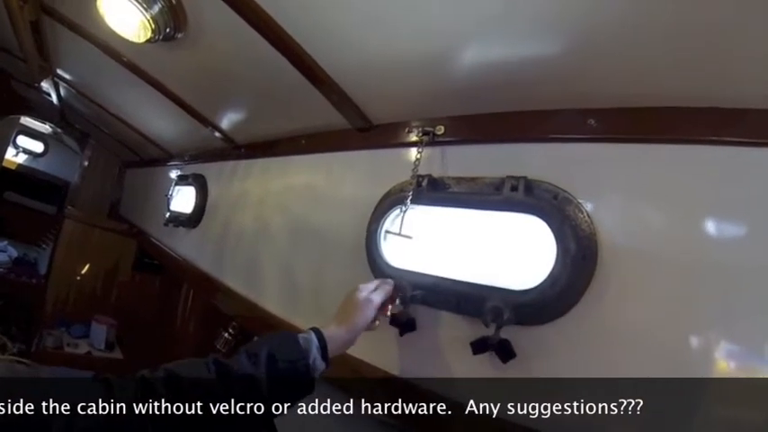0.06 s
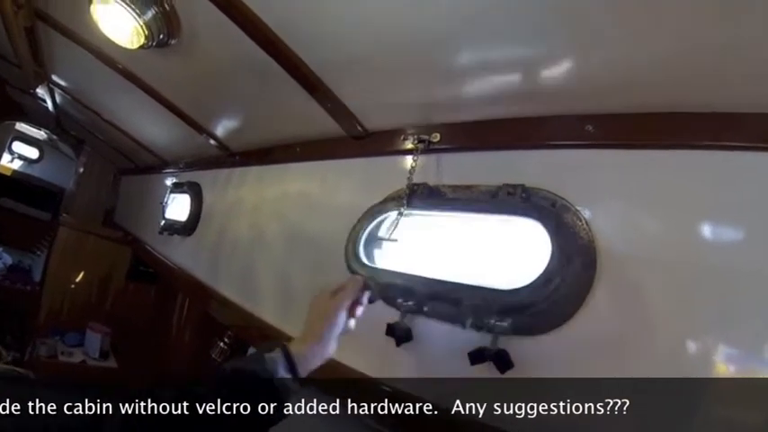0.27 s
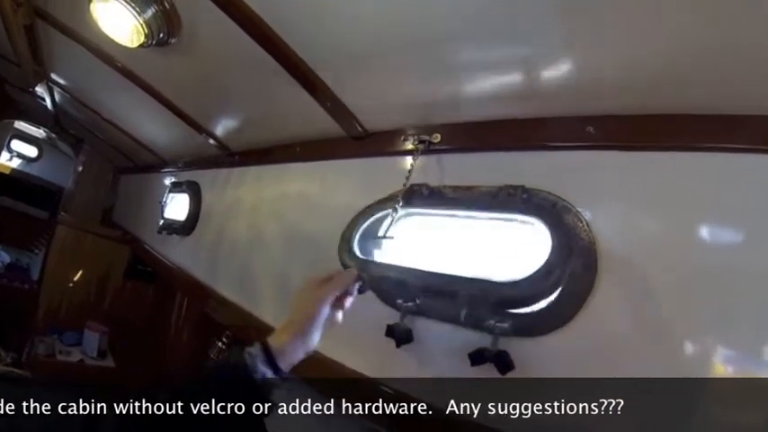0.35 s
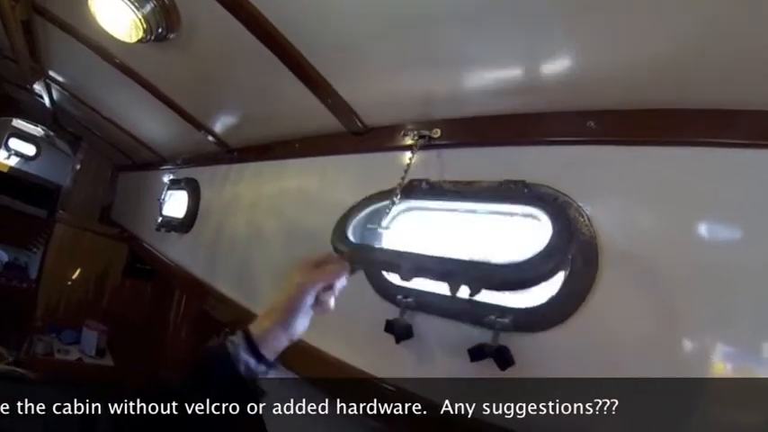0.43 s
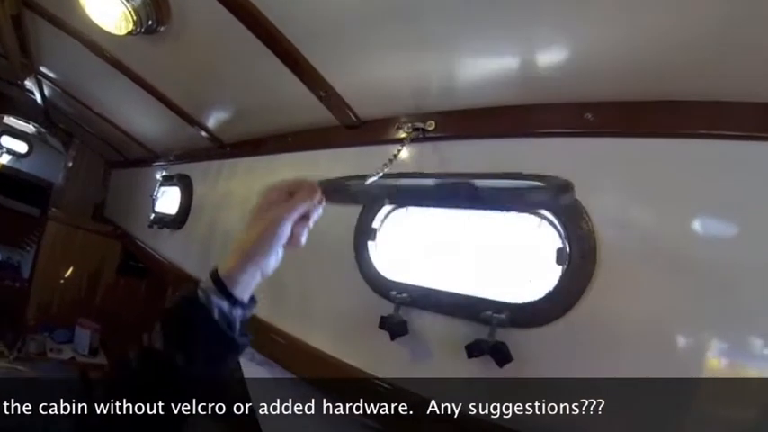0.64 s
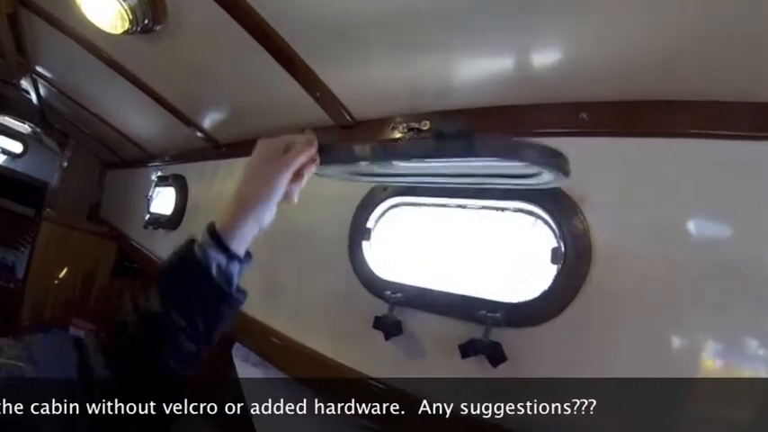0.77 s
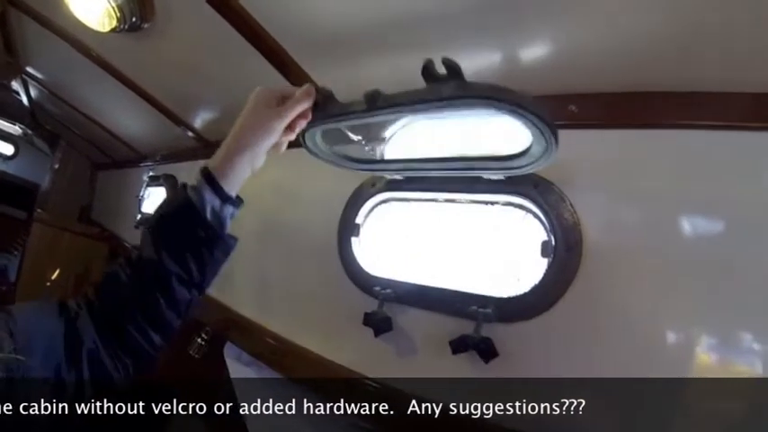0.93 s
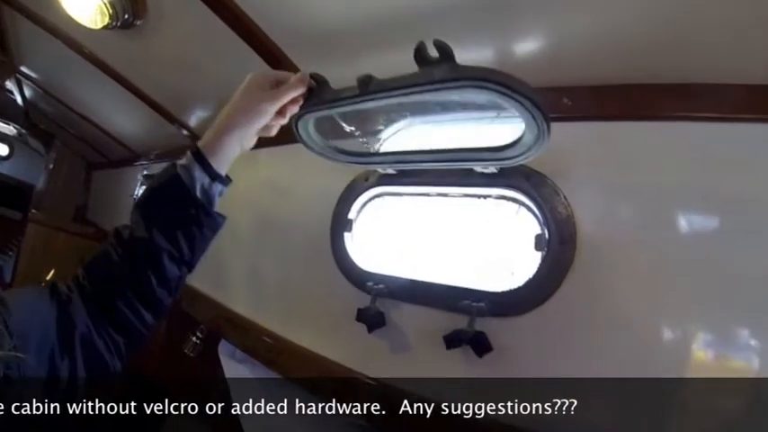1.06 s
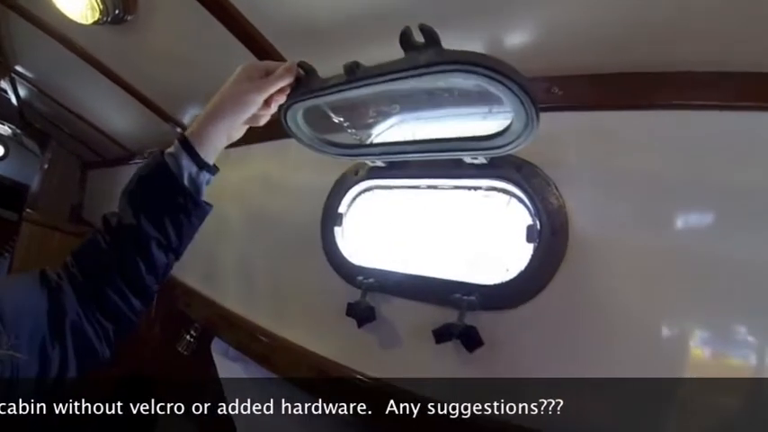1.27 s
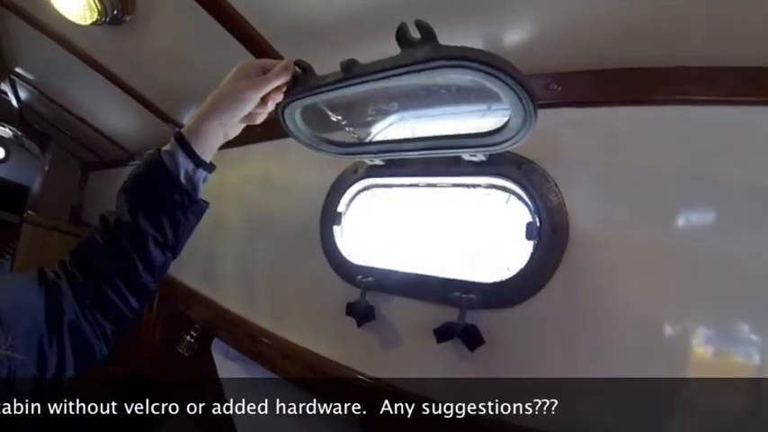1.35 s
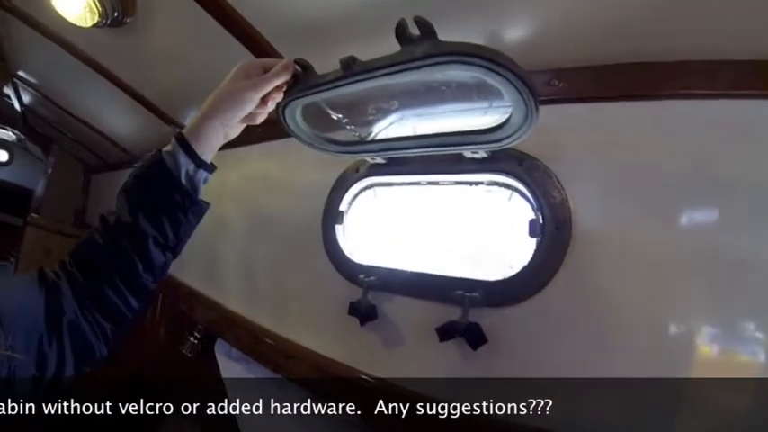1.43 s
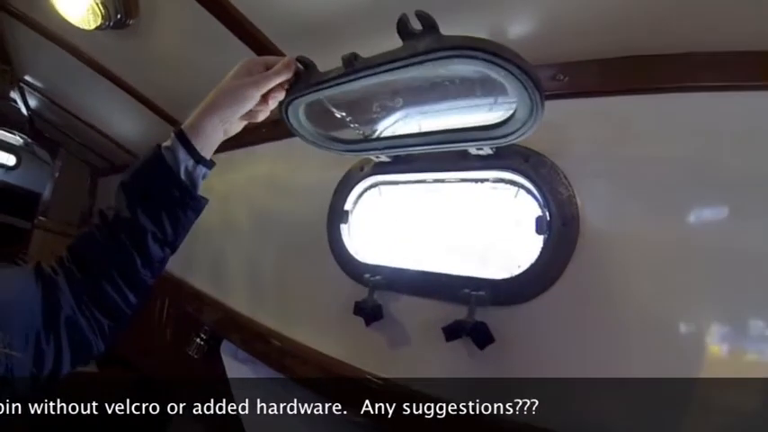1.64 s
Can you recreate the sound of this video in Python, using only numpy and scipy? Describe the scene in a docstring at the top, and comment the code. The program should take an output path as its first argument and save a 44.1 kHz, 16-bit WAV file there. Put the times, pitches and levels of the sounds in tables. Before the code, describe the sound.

A metal porthole window is pulled open in a small boat cabin. Two soft bumps come first, then sharp clacks from 0.2 to 0.5 seconds, with jingling fasteners and dull wall thuds. The hinge rubs softly, and the window rattles and scrapes around 0.8 seconds. Light ticks follow, then a soft knock on the wooden ceiling at 1.2 seconds. A low rumble and faint, high whine continue throughout.

```python
"""A low rumble and two soft bumps, then sharp clacks: a hinged metal porthole window is pulled open
in a small wooden boat cabin. As its frame comes free, each clack sets the loose fasteners ringing and
the cabin wall thudding. The frame swings up on its rubbing hinge, rattles near the top and settles
with a few light ticks and a knock on the wooden ceiling. A faint, high whine pulses throughout."""
import sys
import numpy as np
from scipy import signal
from scipy.io import wavfile
from scipy.ndimage import uniform_filter1d

SR = 44100
rng = np.random.default_rng(int(sys.argv[2]) if len(sys.argv) > 2 else 0)


def waveform_to_disk(signal):
    """Save audio, clipped to [-1, 1], as 16-bit WAV at the path in sys.argv[1]."""
    frames = np.transpose(np.atleast_2d(signal))
    scaled = np.clip(frames, -1, 1) * 32767
    samples = np.round(scaled).astype(np.int16)
    wavfile.write(sys.argv[1], SR, samples)


N = 74970
T = np.arange(N) / SR
BANDS_HZ = 25 * 2 ** (np.arange(29) / 3)  # three bands to an octave
CUTOFF_HZ = 16600

# Metal hitting metal. Each row: start in seconds, strength in dB, extra dB for the upper middle
# pitches, extra dB for the treble, extra dB for the fasteners, pitch in Hz above which the hit fades.
METAL_HITS = [ (0.2044, 1, -1.5, 0, -13, 10200), (.2690, -1.5, 3.5, 2.5, 1, 12500),
              (.3192, -4.5, -3.5, -0.5, 0, 12400), (0.3719, -9.5, 1.5, -0.5, -7.5, 6500),
              (0.4048, -8, -9, -2, -4, 10200), (0.4104, -13.5, 8, 7, -13, 11800),
              (0.4141, -19, -5, 6.5, -1, 12700), (.4237, -21.5, -10, 3, -5, 10800),
              (0.4301, -18.5, 2, 2.5, -6, 8800), (.4640, -5, -0.5, -3, -22, 3660),
              (.4980, -25.5, 3, 3.5, -26, 9700), (0.5121, -29, -4, -4, -9, 7900),
              (.5785, -40, 6.5, -6, -16, 5000), (.7328, -39, -4, 6, -26, 5940),
              (0.7879, -20.5, 3.5, 8, -7, 12500), (.7942, -14, -1, -10, -16, 3500),
              (.7975, -18.5, -13, -8, -15, 11000), (.8059, -14.5, -1, -10, -14, 3500),
              (0.8169, -27, -15, 9.5, 4, 14100), (0.8397, -28.5, 5, 0, -6, 13000),
              (0.8442, -39, 16, 13, -6, 12000), (0.8799, -33.5, 13, 14, -1, 12800),
              (0.8867, -39, 20.5, 5, -5, 11000), (1.0014, -38.5, 11, 13.5, -12, 13100),
              (1.0130, -45, 18, 13.5, -16, 14000)]
# The cabin wall's tones. Each row: pitch in Hz, level in dB, fade time (to fall 60 dB) in seconds.
WALL_TONES = [(112, -54, 0.24), (175.7, -52, 0.66), (271, -48.5, .2), (336.5, -40.5, 0.23),
              (468.6, -40, 0.098), (590, -32.5, 0.06), (642.6, -27, 0.1), (725, -33, 0.08),
              (975, -33.5, 0.031), (1320, -37.5, .03)]


def from_db(db):
    """Turn decibels into a number to multiply by."""
    return 10 ** (np.asarray(db) / 20)


def unit_level(x):
    """Scale a sound to an average (rms) level of 1."""
    return x / np.sqrt(np.mean(x ** 2) + 1e-20)


def at_hz(table, hz):
    """Read a table's columns at a pitch, blending between rows."""
    pitches, *columns = np.transpose(table)
    return [np.interp(np.log(hz), np.log(pitches), column) for column in columns]


def steep_filter(x, hz, kind, order):
    """Keep only the "low" or the "high" side of a pitch."""
    return signal.sosfilt(signal.butter(order, min(hz, CUTOFF_HZ), kind, fs=SR, output="sos"), x)


def band_noise(hz):
    """Noise a third of an octave wide, at level 1."""
    edge = 2 ** (1 / 6)
    band = signal.butter(2, [hz / edge, hz * edge], "band", fs=SR, output="sos")
    return unit_level(signal.sosfilt(band, rng.standard_normal(N + SR // 2))[SR // 2:])


def noise_around(hz, width):
    """Noise gathered around one pitch, at level 1."""
    band = signal.butter(2, [hz - width / 2, hz + width / 2], "band", fs=SR, output="sos")
    return unit_level(signal.sosfilt(band, rng.standard_normal(N)))


def fade(fade_s):
    """A curve that falls 60 dB in fade_s seconds."""
    return np.exp(-np.log(1000) * T / fade_s)


def clicks(starts, db):
    """One click at each start time."""
    out = np.zeros(N)
    np.add.at(out, (starts * SR).astype(int), from_db(db))
    return out


def struck(tones, starts, strength_db):
    """A struck part rings at its own tones, a little differently for each blow."""
    out = 0
    for k, (hz, db, fade_s) in enumerate(tones):
        decay, turn = np.exp(-np.log(1000) / (fade_s * SR)), 2 * np.pi * hz / SR
        blows = clicks(starts, strength_db + db + 0.8 * rng.standard_normal(len(starts)))
        ring = signal.lfilter([0, np.sin(turn)], [1, -2 * decay * np.cos(turn), decay ** 2], blows + 1e-18)
        out = out + (-1) ** k * ring  # neighbouring tones start in opposite directions
    return out


def background():
    """The cabin rumbles and hisses under a faint, pulsing electronic whine."""
    # Rumble and hiss. Each row: pitch in Hz, level of a noise band there in dB.
    cabin_noise = [(25, -63.5), (50, -65.5), (80, -65.5), (115, -61), (170, -62.5), (230, -70.5),
                   (400, -71), (520, -67), (660, -73), (850, -72.5), (1500, -71.5), (2500, -74.5),
                   (5000, -76), (8000, -76.5), (10000, -81), (13500, -82), (16000, -99)]
    rumble = sum(from_db(at_hz(cabin_noise, hz)[0]) * band_noise(hz) for hz in BANDS_HZ)
    whine_hz, pulses_per_s, on_share = 12920, 47.95, 0.35
    pulses = uniform_filter1d(((T * pulses_per_s) % 1 < on_share) * 1., size=40)
    return rumble + from_db(-64.5) * pulses * np.sin(2 * np.pi * whine_hz * T)


def hinge():
    """The hinge rubs softly and unevenly as the frame swings."""
    # How hard it rubs. Each row: time in seconds, level in dB.
    swing = [(0, -56), (.12, -63.5), (.19, -54), (.5, -57.5), (.64, -53), (.69, -57.5), (.76, -53),
             (.92, -61.5), (1.05, -56.5), (1.12, -70), (1.2, -59.5), (1.3, -77), (1.44, -62), (1.7, -81.5)]
    # Where the rubbing rings. Each row: pitch in Hz, width in Hz, level in dB.
    rub_bands = [(259, 205, -3.5), (661.7, 81, 1.5), (1050, 930, -7)]
    jerks_per_s, jerk_db = 22, 3
    jerks = np.interp(T * jerks_per_s, np.arange(100), rng.standard_normal(100))
    level_db = np.interp(T, *np.transpose(swing)) + jerk_db * jerks
    return from_db(level_db) * sum(from_db(db) * noise_around(hz, width) for hz, width, db in rub_bands)


def scrapes():
    """Metal and hand slide lightly on the frame; each scrape swells and fades."""
    # Each row: middle in seconds, length in seconds, level in dB, pitch in Hz, width in Hz.
    slides = [(0.597, 0.15, -56, 1375, 380), (0.805, 0.024, -37.5, 2370, 900),
              (0.826, 0.058, -44, 1550, 447), (1.458, 0.066, -60, 1700, 350)]
    return sum(from_db(db) * np.exp(-(2 * (T - middle) / length) ** 2) * noise_around(hz, width)
               for middle, length, db, hz, width in slides)


def ceiling_knock():
    """The open frame meets the wooden ceiling: a short knock and a little cabin echo."""
    # The wood's tones. Each row: pitch in Hz, level in dB, fade time in seconds.
    wood_tones = [(978, -17, 0.0067), (1270, -19, 0.0055), (1620, -2, 0.0073), (2170, -15, 0.0081),
                  (3130, -13.5, 0.014), (3740, -18, 0.016), (4900, -29, 0.0076)]
    start, db = np.array([1.2292]), np.array([-26])
    echo = signal.fftconvolve(clicks(start, db - 24), fade(0.2))[:N]
    return struck(wood_tones, start, db) + echo * noise_around(hz=2070, width=2300)


def wall_bumps():
    """Hand and frame bump the cabin wall, which thuds and gives a dull rustle."""
    # Each row: start in seconds, strength in dB.
    bumps = [(.0635, -21), (.1010, -12.5), (.4705, 0.5), (.7328, -10), (1.0130, -21.5), (1.1640, -15),
             (1.1900, -26), (1.2290, -25)]
    starts, db = np.transpose(bumps)
    rustle = signal.fftconvolve(clicks(starts, db - 35), fade(0.084))[:N]
    return struck(WALL_TONES, starts, db) + rustle * noise_around(hz=965, width=790)


def fasteners(starts, strength_db):
    """Loose fasteners jingle, and the cabin smears the sound into a thin, high shimmer."""
    # Each row: pitch in Hz, width in Hz, level in dB, fade time in seconds.
    jingles = [ (10370, 200, -37, .11), (11450, 220, -42, .11), (12200, 400, -44, .11),
               (13920, 150, -34, .16)]
    out, hit_power = 0, clicks(starts, strength_db) ** 2
    for hz, width, db, fade_s in jingles:
        power = signal.fftconvolve(hit_power, fade(fade_s) ** 2)[:N]
        out = out + from_db(db) * np.sqrt(np.abs(power)) * noise_around(hz, width)
    return out


def hit_strength_db(hz):
    """Each metal hit's own strength at a pitch; the faint late ticks are thin and bright."""
    base_hz, upper_middle_hz, treble_hz = 1490, 2700, 4960
    anchors = np.log([base_hz, upper_middle_hz, treble_hz])
    return np.array([db + np.interp(np.log(hz), anchors, [0, middle, treble])
                     for _, db, middle, treble, _, _ in METAL_HITS])


def crack_and_echo(starts, top_hz):
    """Each hit gives a very short crack of noise, which then dies away in the cabin."""
    # The crack. Each row: pitch in Hz, level in dB.
    crack = [(300, -52), (750, -56), (1200, -21.5), (2200, -25.5), (3000, -23), (4300, -36.5),
             (5300, -19.5), (8000, -35), (11000, -36.5), (15000, -26)]
    # The cabin's echo. Each row: pitch in Hz, level in dB, fade time in seconds.
    echo = [(250, -51.5, 0.66), (327, -43.5, 0.5), (453, -51.5, 0.49), (780, -44.5, 0.21),
            (1350, -40, 0.26), (2100, -39.5, .22), (3150, -40, 0.195), (5100, -41.5, .19),
            (7560, -46, 0.23), (10800, -50, 0.17), (15000, -56.5, 0.1)]
    out, echo_rise = 0, 1 - np.exp(-(T / 0.0096) ** 2)
    for hz in BANDS_HZ[10:]:  # from about 250 Hz up
        crack_db, = at_hz(crack, hz)
        echo_db, echo_s = at_hz(echo, hz)
        shape = from_db(crack_db) * fade(0.016) + from_db(echo_db) * echo_rise * fade(echo_s)
        dulling_db = -10 * np.log10(1 + (hz / top_hz) ** 10)
        hits = clicks(starts, hit_strength_db(hz) + dulling_db)
        power = signal.fftconvolve(hits ** 2, shape[:SR // 2] ** 2)[:N]
        out = out + np.sqrt(np.abs(power)) * band_noise(hz)
    return out


def frame_clacks(starts, top_hz):
    """The metal frame clacks, its ring cut short by the hand and the rubber seal."""
    # The frame's tones. Each row: pitch in Hz, level in dB, fade time in seconds.
    frame_tones = [(1130, -30, 0.016), (1437, -9, 0.016), (1705, -28.5, 0.015), (2210, -27.5, 0.0086),
                   (2637, -19, 0.011), (2980, -22, 0.012), (3184, -23.5, .013), (3730, -35, 0.023),
                   (4770, -22, .014), (5160, -21.5, 0.012), (6000, -31, 0.011), (6640, -27.5, 0.014),
                   (9200, -29, 0.0069), (10000, -35, 0.0033)]
    hz, tone_db, fade_s = np.transpose(frame_tones)
    out, t = np.zeros(N + SR), T[:SR // 20]
    for start, hit_db, top in zip(starts, hit_strength_db(hz), top_hz):
        ring_s = fade_s * (1.13 if start > 0.44 else 1)  # clear of the seal, it rings longer
        tones = np.cos(2 * np.pi * hz[:, None] * t) * np.exp(-np.log(1000) * t / ring_s[:, None])
        clack = from_db(hit_db + tone_db + 0.8 * rng.standard_normal(len(hz))) @ tones
        first = int(start * SR)
        # Each hit loses its treble above its own top pitch: some are dull knocks, others bright ticks.
        out[first:first + len(t)] += steep_filter(clack, top, "low", order=7)
    return steep_filter(out[:N], 754, "high", order=4)  # the frame gives off little bass


def scene():
    """Add the metal, the wood and the background into one channel."""
    starts, db, _, _, fastener_db, top_hz = np.transpose(METAL_HITS)
    metal = frame_clacks(starts, top_hz) + fasteners(starts, db + fastener_db)
    cracks = crack_and_echo(starts, top_hz)
    thuds = struck(WALL_TONES, starts, db - 15)  # each metal hit also shakes the wall
    wood = thuds + wall_bumps() + ceiling_knock()
    return (metal + cracks + wood + hinge() + scrapes() + background())[None]


def record(dry):
    """The highest treble is softened and then cut off steeply."""
    softened = steep_filter(dry, 14400, "low", order=9)
    return signal.sosfilt(signal.cheby2(14, 60, CUTOFF_HZ, fs=SR, output="sos"), softened)


dry = scene()
out = record(dry)
waveform_to_disk(out)
```